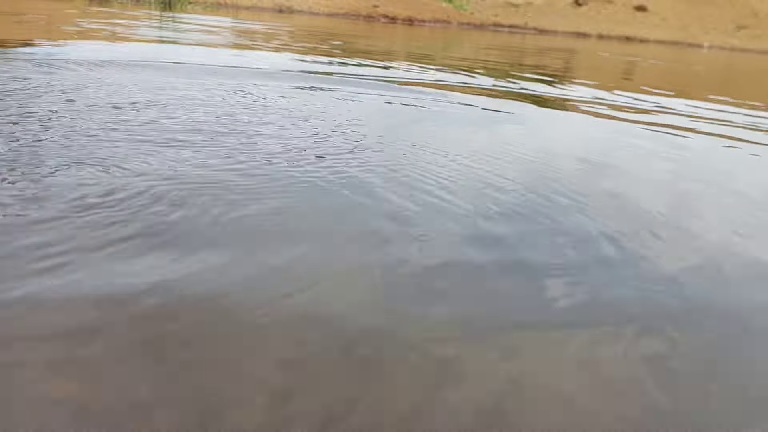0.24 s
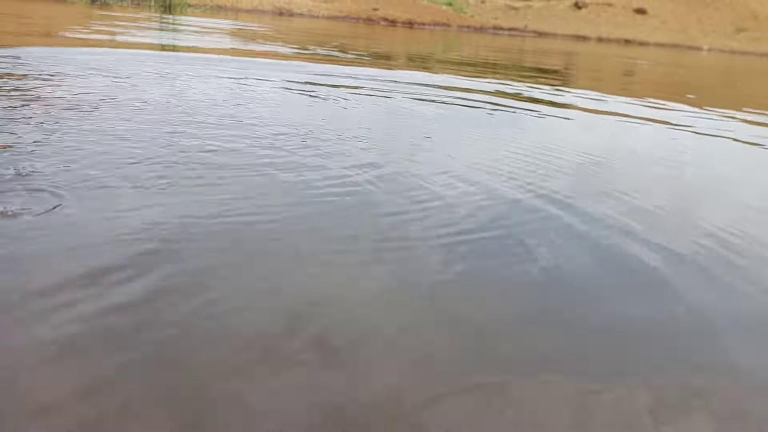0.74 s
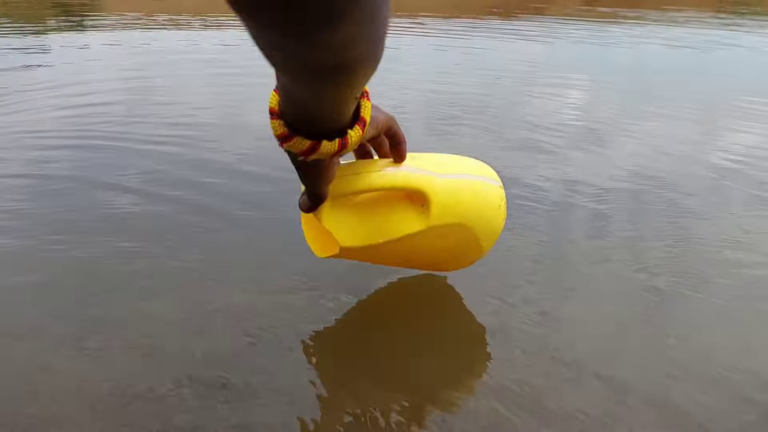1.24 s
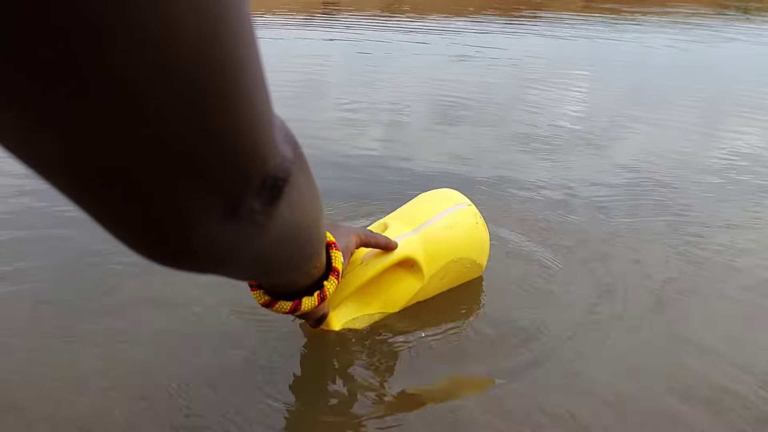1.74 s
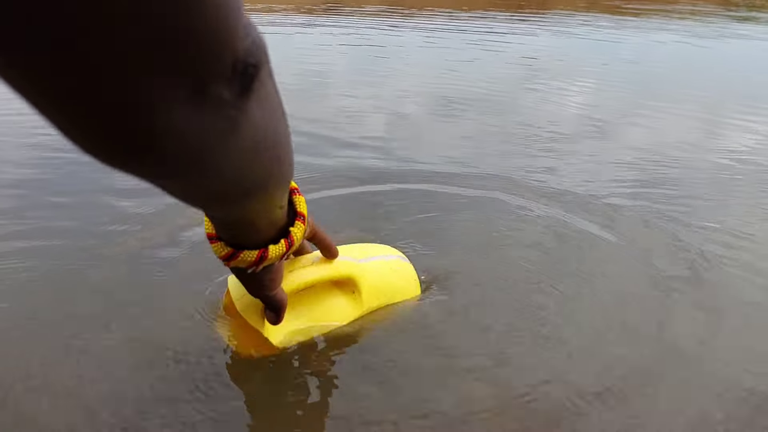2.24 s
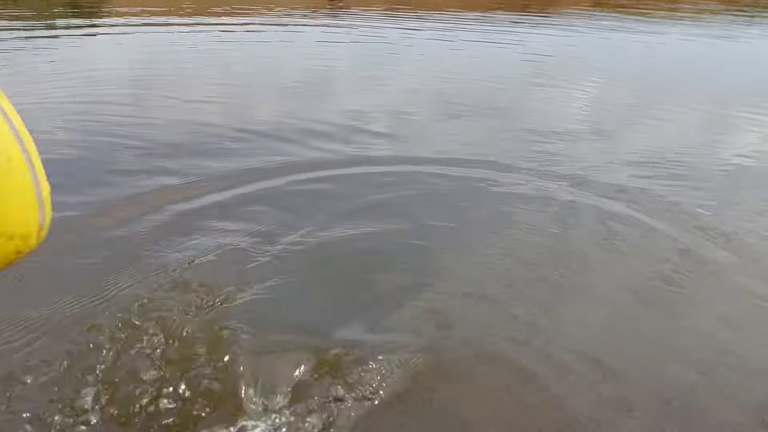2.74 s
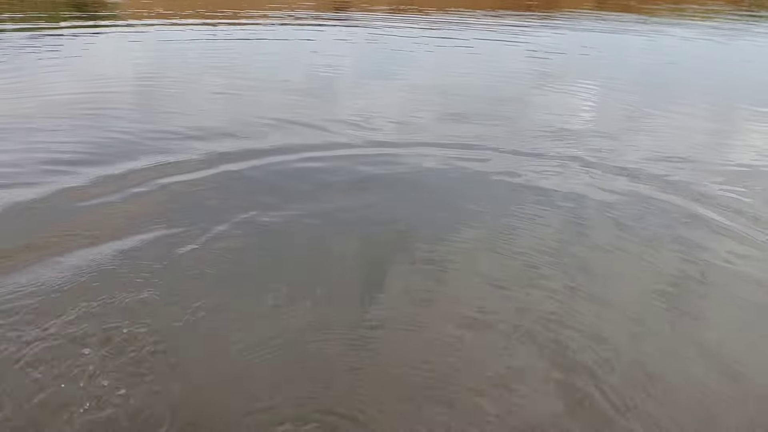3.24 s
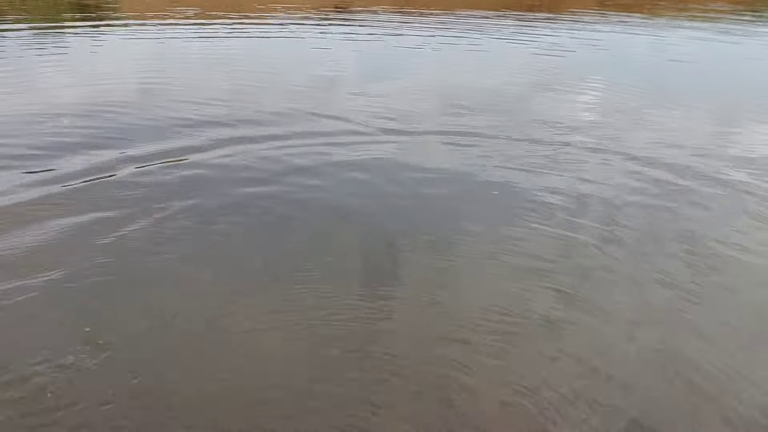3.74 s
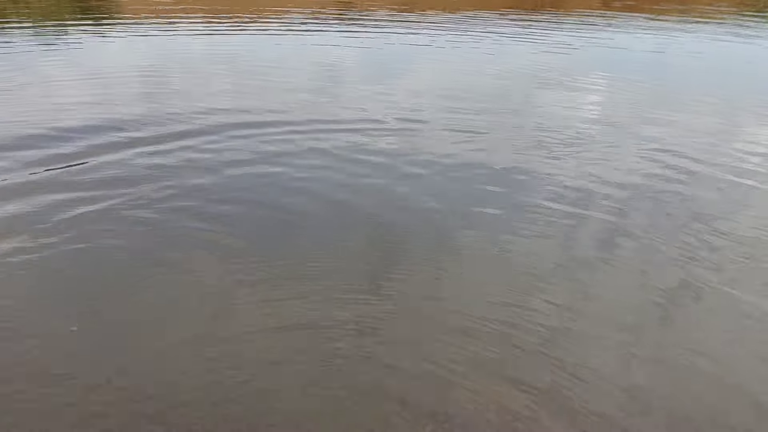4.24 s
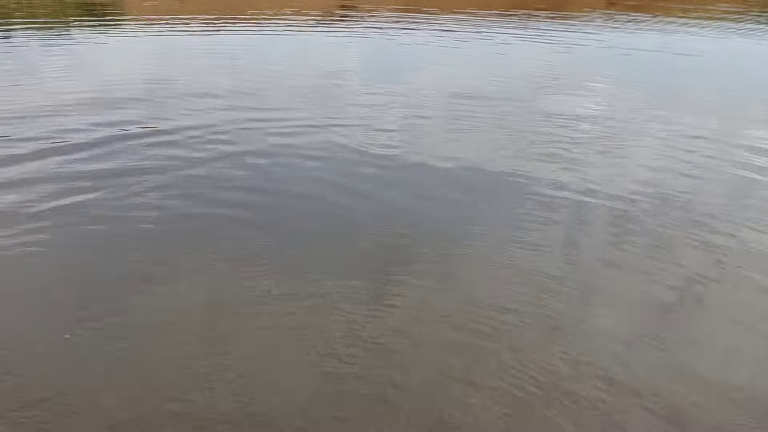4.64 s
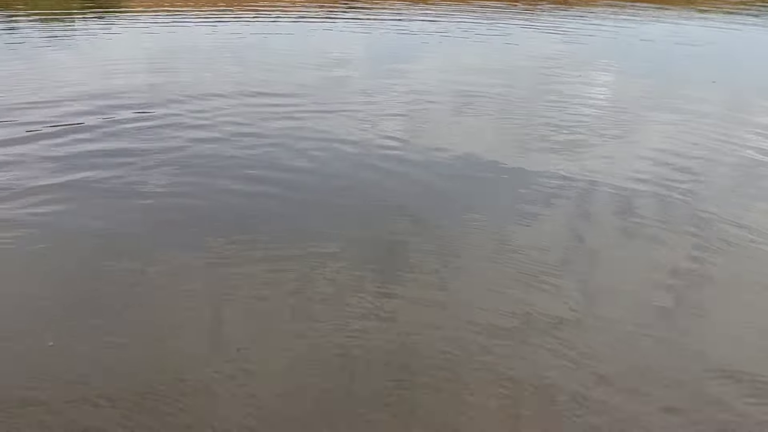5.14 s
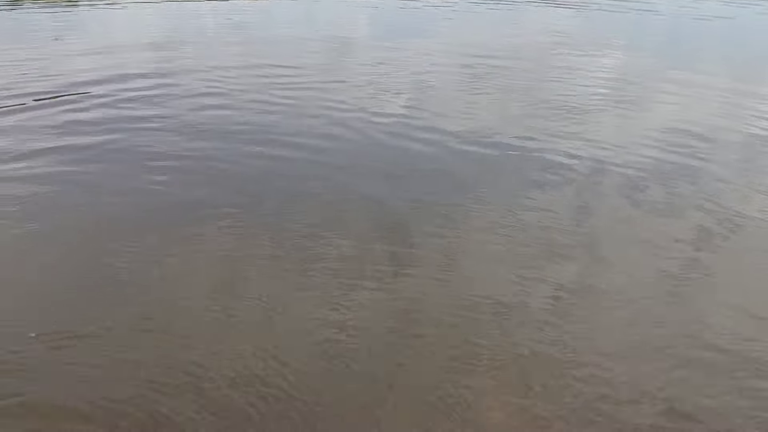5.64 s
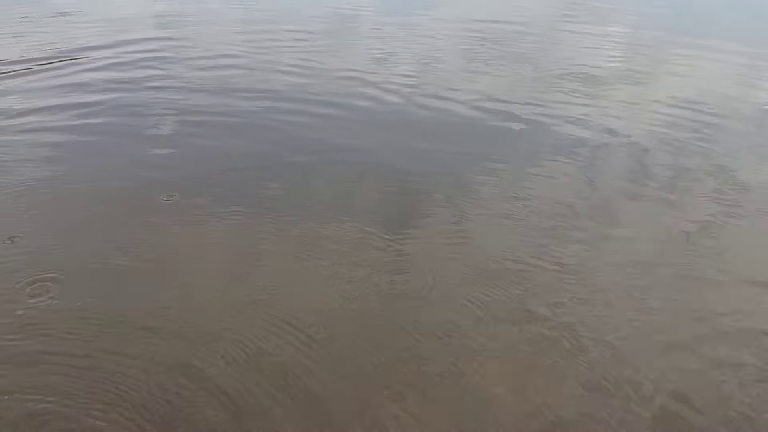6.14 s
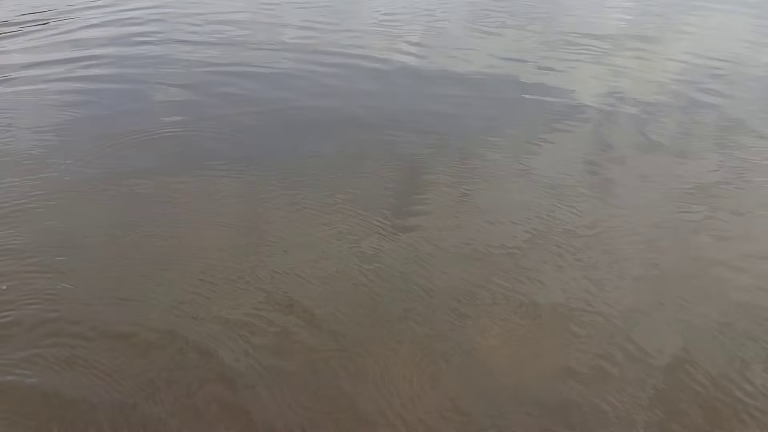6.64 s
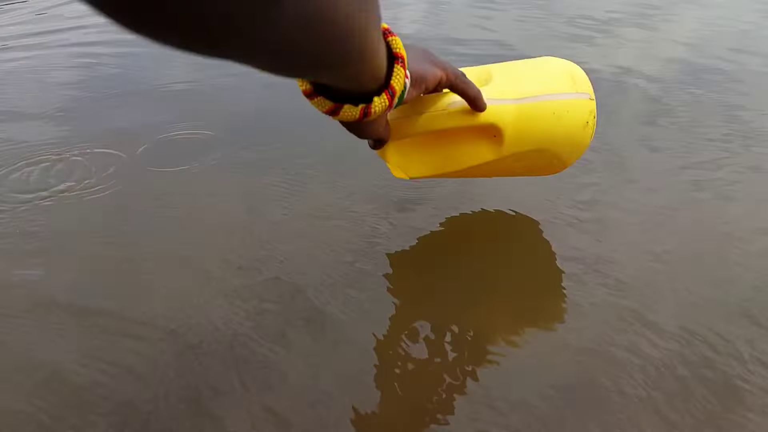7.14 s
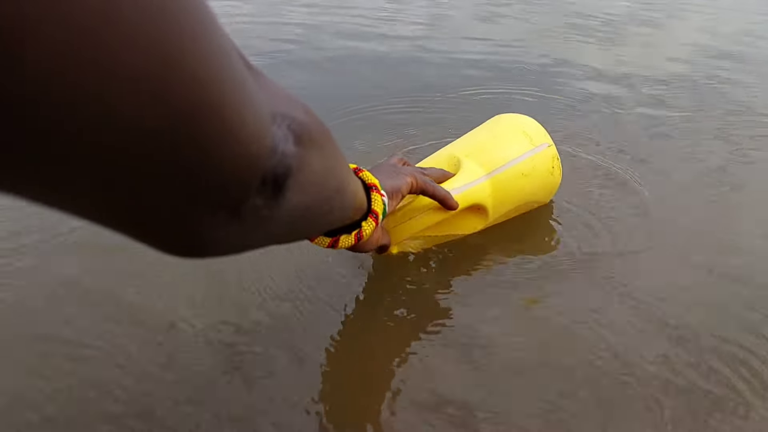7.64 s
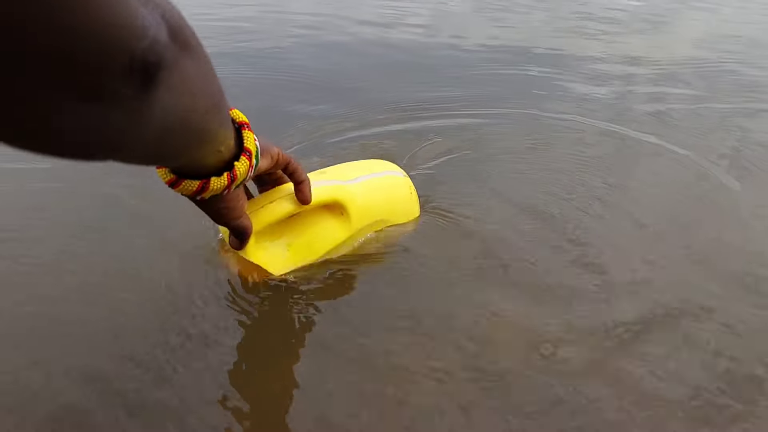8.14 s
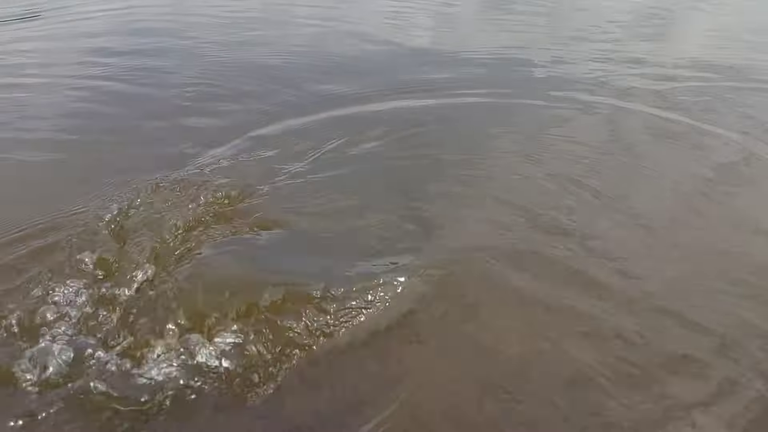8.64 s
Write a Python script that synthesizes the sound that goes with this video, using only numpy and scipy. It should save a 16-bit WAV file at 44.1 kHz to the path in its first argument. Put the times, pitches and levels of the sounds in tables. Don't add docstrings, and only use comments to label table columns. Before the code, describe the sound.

Close stereo microphone in the open: a rapid engine throb fills the first second, then drops far away. Jug water plips, gulps and splashes near centre; drops patter leftward; the stream drums and slaps inside a plastic can for over two seconds. After a hollow knock, violent low gusts overload the right channel, stop suddenly, and the jug bubbles and splashes again.

```python
import sys
import numpy as np
from scipy import signal
from scipy.fft import rfft, irfft, next_fast_len
from scipy.io import wavfile
from scipy.ndimage import uniform_filter1d, map_coordinates

SR = 44100
rng = np.random.default_rng(int(sys.argv[2]) if len(sys.argv) > 2 else 0)


def wrap_up_sound(samples):
    columns = np.atleast_2d(samples).T
    tamed = np.clip(columns, -1, 1)
    steps = np.round(tamed * 32767).astype(np.int16)
    wavfile.write(sys.argv[1], SR, steps)


def rack_gain(trim_db):
    fader = np.asarray(trim_db, float)
    return 10 ** (fader / 20)


N = 392038
T = np.arange(N) / SR
SCENE_CHANGE_S, GAIN_DROPS_S = 1.2495, 7.535

# time in seconds, level in dB.
POUR_FLOW = [(3.88, -73), (3.95, -50.5), (4.7, -52.5), (5.3, -47), (5.9, -53), (6.42, -51.5), (6.52, -87)]
# peak time in seconds, level in dB.
SURGES = [
    (3.96, -44),
    (4.34, -47.5),
    (4.57, -56),
    (4.8, -38.5),
    (4.95, -45),
    (5.16, -42),
    (5.43, -44.5),
    (6.04, -49),
    (6.24, -49.5),
    (6.39, -48),
]
# start in seconds, peak in dB.
RIM_SPLATS = [
    (3.932, -27),
    (3.951, -29),
    (4.136, -39),
    (4.709, -38),
    (4.822, -31),
    (4.9057, -26),
    (4.9577, -29),
    (5.26, -35),
    (5.5795, -35),
    (6.1264, -38),
]
# start in seconds, peak in dB.
WALL_SLAPS = [(3.9326, -37.5), (3.9523, -34.5), (4.335, -26), (4.5065, -45), (4.7106, -32), (4.755, -49),
              (4.7749, -49), (4.8188, -38), (4.861, -46), (4.908, -53), (4.9894, -49), (5.0956, -29),
              (5.135, -27), (5.2887, -31.5), (5.3276, -49), (5.389, -33), (5.4314, -29), (5.5232, -29),
              (5.58, -26), (5.633, -29), (5.694, -39), (5.746, -26.5), (5.8021, -47), (5.833, -31),
              (5.948, -37), (6.0076, -54), (6.0265, -29), (6.1284, -34), (6.2002, -29), (6.2403, -32),
              (6.3592, -42), (6.3753, -51)]
# centre in Hz, width in Hz, level in dB.
CAN_MODES = [(714, 133, -11.5), (1283, 34, -10), (1589, 42, -4.5), (2050, 36, -8), (2610, 240, -11.5),
             (3487, 230, -3), (5360, 150, -13.5), (5360, 360, -10.5), (6950, 170, -32)]
# time in seconds, share of pitch.
CAN_TUNING = [(3.9, 1.02), (5.0, 1.02), (5.6, .975), (5.95, .97), (6.45, 1.0)]
# time in seconds, level in dB.
CAN_RING = [(3.9, -2), (5.05, -1.5), (5.13, 0), (5.9, 0), (6.0, -3), (6.5, -4)]
# frequency in Hz, gain in dB.
STREAM_TONE = [(80, -22.5), (160, 4.5), (400, -7), (1000, -24), (2500, -11.5), (5000, -38), (9000, -67)]
# frequency in Hz, density in dB per Hz.
SPATTER_TONE = [(2060, -35), (3500, -21), (3950, -9.5), (6910, -10), (8530, -19), (12400, -13),
                (16000, -25)]

# start in seconds, peak in dB, pitch in Hz, pitch rise as a share,
# T60 in seconds.
GULPS = [(2.012, -43.5, 330, 1.5, 0.059), (2.048, -50.5, 776, 1, 0.068), (2.095, -53, 378, 2.5, 0.14),
         (2.268, -51.5, 2010, -0.5, 0.046), (2.318, -54, 630, .1, 0.053), (2.518, -44.5, 450, .2, 0.057),
         (2.784, -35, 800, 0, .05), (2.789, -30, 430, 0.3, 0.036), (2.863, -29.5, 554, 1.1, 0.042),
         (2.866, -33.5, 770, 2.5, 0.045), (2.62, -47, 623, 1, 0.082), (2.745, -48, 447, 2, 0.12),
         (2.39, -55, 786, 0, 0.047), (5.02, -41, 490, 3.5, 0.075), (6.843, -51, 570, 0, 0.037),
         (8.565, -50, 387, 0, 0.066), (3.951, -32.5, 166, 0, 0.16), (5.085, -42.5, 377, 1, 0.079),
         (7.005, -29.5, 380, 0, 0.088), (7.938, -50, 318, 0, 0.065), (8.044, -49.5, 336, -1, 0.088),
         (8.076, -41, 342, 0.4, 0.062), (8.104, -42.5, 421, 0, 0.091), (8.34, -54.5, 1040, 0, 0.066),
         (8.39, -47.5, 797, 5, 0.11), (8.447, -51, 935, 0, 0.069), (8.472, -42, 853, 3, 0.069),
         (8.545, -41, 640, 0.9, 0.057), (8.578, -49, 550, 2.5, 0.086), (8.606, -53, 500, 2, 0.18),
         (8.662, -52, 413, 5, 0.13), (8.677, -38.5, 713, 1.1, 0.064), (8.685, -44, 397, -0.5, 0.052),
         (8.692, -46.5, 626, .5, 0.093), (8.698, -48, 885, 8, 0.107), (8.785, -47, 715, 0, 0.08)]
# start in seconds, peak in dB, pitch in Hz, # pitch
# rise as a share, T60 in seconds.
MORE_GULPS = [
    (3.0285, -32, 620, -.15, .09),
    (3.04, -49, 560, .35, .2),
    (3.029, -37, 1000, .9, .036),
    (3.034, -45, 1330, .15, .04),
    (3.125, -36, 600, .15, .06),
    (3.14, -52, 650, .8, .13),
    (3.148, -57, 1050, 2.5, .07),
    (3.166, -54, 1000, 25, .5),
]
# start in seconds, peak in dB, pitch in Hz, pitch rise as a share.
SLOSHES = [
    (2.037, -46, 339.5, -0.9),
    (2.569, -38.5, 420, 2.5),
    (2.655, -52, 451, -1),
    (7.898, -61, 414, -0.9),
    (8.511, -53, 394, -0.5),
]
# start in seconds, peak in dB, pitch in Hz.
PLIPS = [(1.593, -45, 2670), (1.604, -46.5, 1140), (1.693, -52, 2380), (1.305, -50, 1390),
         (2.492, -37.5, 1410), (2.565, -31, 1090), (2.617, -40, 1060), (2.734, -26, 2230),
         (3.625, -54.5, 870), (4.3391, -36.5, 1640), (5.399, -38, 1850), (7.006, -41.5, 1360),
         (7.7388, -61, 1236), (8.321, -41, 1510), (8.363, -47, 1540), (8.419, -39, 1420),
         (8.4707, -42, 1240), (8.488, -37.5, 1000), (8.5834, -41.5, 1210), (8.653, -32, 2550),
         (8.664, -38, 2900), (8.566, -47, 2250), (8.687, -45, 1640), (8.74, -50, 1280), (6.634, -48, 1640),
         (6.634, -50.5, 2700), (8.3, -45, 2400), (7.007, -43.5, 2300)]
# start in seconds, peak in dB, pitch in Hz.
NECK_BLIPS = [(1.89, -57.5, 1310), (1.935, -52.5, 1240), (1.986, -57, 2150), (2.036, -46, 1217),
              (2.104, -55, 1170), (2.131, -52.5, 1230), (2.15, -64, 2200), (2.215, -62, 1300),
              (2.33, -58, 2150), (7.935, -57, 1240), (7.968, -56, 2290), (8.024, -50.5, 2260),
              (8.034, -50, 1190), (8.06, -50, 1255), (8.077, -44.5, 1360), (8.082, -45, 1800),
              (8.084, -43.5, 2140), (8.103, -61, 1320), (8.125, -57, 1330)]
# start in seconds, peak in dB, pitch in Hz.
DROPS = [(0.2905, -37, 2550), (0.6878, -32, 5000), (1.3055, -49, 2480), (1.486, -47.5, 4385),
         (2.2263, -50.5, 5000), (2.5354, -34.5, 6400), (2.628, -35, 3600), (2.668, -34, 3300),
         (2.6927, -33.5, 3200), (2.7916, -27, 2800), (2.835, -34, 5100), (2.8629, -25, 4440),
         (3.1053, -40, 6700), (2.8625, -29, 2870), (3.4317, -48, 2500), (3.4715, -49, 7900),
         (3.5262, -39.5, 4770), (3.5788, -49, 6000), (3.702, -68, 7800), (3.7179, -39.5, 5280),
         (3.767, -41.5, 5000), (3.8104, -37.5, 6400), (3.8545, -39, 4700), (6.6365, -36.5, 5030),
         (3.622, -53.5, 2470), (6.7785, -45, 3480), (6.822, -50, 5200), (7.005, -38, 3060),
         (8.0785, -42, 4350), (8.003, -46.5, 5600), (1.662, -47, 5900)]
# start in seconds, peak in dB, pitch in Hz.
SPECKS = [(2.4606, -45, 2520), (2.4776, -39, 5350), (2.5107, -41, 2520), (2.5484, -32.5, 3360),
          (2.598, -39, 3780), (2.618, -44, 3930), (2.6484, -30.5, 3550), (2.7158, -38, 2210),
          (2.776, -38, 2850), (2.9282, -38, 13800), (2.989, -43, 5630), (3.014, -45, 12700),
          (6.5407, -49, 3080), (6.8433, -43, 2160), (8.2247, -52, 5220), (8.297, -57, 2410),
          (8.3629, -55, 2240), (8.3908, -49, 2050), (8.4088, -55, 4190), (8.4193, -43, 6970),
          (8.4477, -54, 2080), (8.4791, -41, 2140), (8.4989, -39, 2220), (8.5649, -40, 2170),
          (8.6088, -52, 2090), (8.6243, -39, 2480), (8.672, -39, 9100), (8.68, -34, 2980),
          (8.768, -46, 6750), (8.7999, -41.5, 3900), (8.8273, -52, 2120)]
# start in seconds, peak in dB, pitch in Hz.
CRACK = (1.0456, -2.5, 2140)

# peak time in seconds, level in dB, seconds to build 20 dB,
# spray over gurgle in dB.
SPLASHES = [(1.3, -63, 0.32, -17), (1.612, -59.5, 0.06, -0.5), (2.049, -59.5, 0.09, -0.5),
            (2.25, -60, 0.37, -6.5), (2.533, -55, 0.12, -9.5), (2.631, -44, 0.15, -5.5),
            (2.72, -44.5, 0.1, -21), (2.792, -38, 0.1265, -4.5), (3.042, -61, -0.01, -24.5),
            (3.17, -60, 0, -22), (3.61, -78, 0.08, 19.5), (8.04, -65, 0.68, -3), (8.33, -70, 0.6, -4),
            (8.47, -55, 0.0649, -6), (8.53, -49.5, 0.14, -5), (8.585, -51, 0.14, -9.5),
            (8.65, -50.5, .12, -14), (8.68, -44, 0.047, -10.5), (8.74, -62, 0, -9), (8.84, -63.5, 0.5, -5)]
# time in seconds, level in dB.
TRICKLE = [(1.25, -78.5), (2.898, -66), (3.8, -66), (3.92, -48.5), (3.98, -66.5), (7.55, -73), (7.6, -93),
           (8.9, -92)]
# frequency in Hz, density in dB per Hz.
SPRAY_TONE = [(1200, -39), (2600, -15.5), (5350, -6), (8800, -9.5), (12500, -1.5), (15500, -9.5),
              (16200, -20)]
# peak time in seconds, level in dB.
NECK_AIR = [(1.99, -57), (2.05, -51), (2.11, -54), (2.16, -54), (2.21, -60), (2.26, -60), (7.94, -72),
            (8.0, -71), (8.04, -60), (8.08, -43.5), (8.13, -57)]
# centre in Hz, width in Hz, level in dB.
JUG_MODES = [(348, 180, -1.5), (1294, 110, -2.5), (2140, 170, -9.5), (3300, 280, -13.5)]
# peak time in seconds, level in dB.
RUSTLE = [
    (6.64, -61.5),
    (6.725, -58.5),
    (7.005, -59),
    (7.25, -53),
    (7.36, -52),
    (7.46, -57),
]
# time in seconds, left port's lead in samples.
WATER_LAG = [(0, -20), (1.25, -20), (1.3, 3), (2.6, 4), (2.7, 16), (3, 17), (3.02, 6), (3.08, 6),
             (3.11, 17), (3.8, 17), (3.92, 24), (6.5, 24), (6.63, 17), (7, 4), (7.9, 5), (8.3, 7)]

# time in seconds, firing rate in Hz, level in dB.
NEAR_ENGINE = [(0, 48.26, -33), (.5, 48.49, -30), (1.05, 48, -29.5), (1.15, 47.6, -30.5),
               (1.235, 47.9, -37), (1.25, 49.55, -68)]
FAR_ENGINE = [(1.24, 44.5, -91), (1.26, 42.97, -52), (3, 43.2, -51.5), (5, 43.45, -59),
              (7.52, 43.86, -53.5), (7.6, 44.35, -62.5), (8.89, 43.67, -66.5)]
# multiple of firing rate, level in dB.
NEAR_ORDERS = [(1, -7.5), (2, 1.5), (3, 0), (4, -16), (5, -4.5), (6, 2.5), (7, -1), (8, -23.5), (9, -8),
               (10, -3), (11, -8), (12, -7.5), (13, -53.5), (14, -24), (15, -6.5), (16, -7.5), (17, -13.5)]
FAR_ORDERS = [(1, -3), (2, -6), (3, 3.5), (4, 0), (5, 2), (6, 4), (7, 3.5), (8, -4), (9, -9), (10, -12.5),
              (11, -15.5), (12, -14), (14, -39)]
# frequency in Hz, density in dB per Hz.
CLATTER_TONE = [(60, -21), (120, -17.5), (300, -11.5), (500, -14.5), (903, -20.5), (3120, -26.5),
                (7000, -36), (9000, -45.5), (12100, -41), (16000, -54)]

# time in seconds, level in dB.
BREEZE = [(1.25, -67), (1.7, -55), (3.6, -61.5), (4.2, -54.5), (5.1, -51), (5.5, -55), (6.5, -58.5),
          (7.55, -46), (7.62, -65), (8.78, -66), (8.82, -40.5), (8.9, -65)]
# peak time in seconds, level in dB.
GUSTS = [(1.78, -48), (2.26, -49), (2.62, -37.5), (2.9, -40.5), (3.02, -43), (3.46, -42), (4.25, -34.5),
         (4.369, -27.5), (4.59, -36), (4.98, -43.5), (5.18, -35.5), (6.56, -33), (6.657, -20.5),
         (6.78, -27), (6.94, -27), (7.2, -17), (7.311, -21), (7.407, -13.5), (7.52, -17.5)]
# time in seconds, peak in dB.
BUFFETS = [(6.552, -33.5), (6.614, -30), (6.641, -40), (7.117, -25.5), (7.17, -17), (7.19, -16.5),
           (7.308, -22), (7.322, -14), (7.353, -14), (7.37, -22), (7.384, -10), (7.403, -5.5), (7.406, -3),
           (7.419, -12.5), (7.479, -15.5), (7.489, -17), (7.509, -19.5), (7.519, -20.5)]
# frequency in Hz, density in dB per Hz.
GUST_TONE = [(15, -38), (30, -8.5), (55, 2), (110, -7.5), (200, -20.5), (400, -60.5), (900, -92)]
GUST_EDGE_TONE = [(40, -35.5), (150, 3.5), (300, -15), (550, -30), (1200, -68.5), (2500, -100)]
# frequency in Hz, density in dB per Hz.
HISS_TONE = [(350, -18.5), (600, 0), (2200, -17), (4370, -11), (7080, -6.5), (8590, -22.5), (11600, -9.5),
             (16200, -14)]
# frequency in Hz, density in dB per Hz.
WASH_TONE = [(250, -15.5), (600, -4.5), (3300, -12.5), (6000, -20.5)]


def pour():
    flow_db, = curves(POUR_FLOW)
    stream_db = swells(SURGES, 0.081, 1.34, flow_db)
    stream_db = np.minimum(stream_db, flow_db + 7.0)
    spatter_db = -54.5 + 1.27 * (stream_db + 49.5)
    surge_db = wobble(30)

    churn = fizz(count=6000, hz=1800, spread=0.722, cycles=20.0, size_db=0.5, rise=0.068, longest_s=0.016)
    rush = 0.82 * rng.standard_normal((2, N))
    stream = patchy(can(churn + rush), depth_db=4.0, bins=4, frames=20)
    spatter = patchy(grit(count=7000, spectrum=SPATTER_TONE, smooth=1.2), depth_db=2.2, bins=18, frames=6)

    out = stereo(rack_gain(stream_db + surge_db) * stream, 0.25, 3.2, 24.4)
    return out + stereo(rack_gain(spatter_db + surge_db + wobble(90)) * spatter, 0.29, 8.9, 24.3)


def can(x):
    steps = np.array([.97, .995, 1.02])
    where = np.interp(np.interp(T, *np.transpose(CAN_TUNING)), steps, np.arange(3))
    where = np.clip(where + .35 * wobble(6), 0, 2)
    ringing = np.zeros((2, N))
    for k, step in enumerate(steps):
        share = np.sqrt(np.clip(1 - np.abs(where - k), 0, 1))
        ringing += share * filtered(np.roll(x, 999 * k, 1), lambda f: rings(CAN_MODES)(f / step))
    direct = filtered(x, lambda f: tone(STREAM_TONE)(f) * rack_gain(-2.0))
    return direct + rack_gain(np.interp(T, *np.transpose(CAN_RING))) * ringing


def slaps():
    s, db = np.transpose(WALL_SLAPS)[:, :, None]
    hz, width_hz, mode_db = np.transpose(CAN_MODES)
    scatter_db = 5 * rng.standard_normal((len(WALL_SLAPS), len(CAN_MODES)))
    gain = rack_gain(db + mode_db - 6 + scatter_db)
    tuned_hz = hz * np.interp(s, *np.transpose(CAN_TUNING))
    t60_s = np.log(1000) / np.pi / width_hz
    rows = np.broadcast_arrays(s, gain, tuned_hz, 0, t60_s)
    ring = grains(*(v.ravel() for v in rows), 4)
    return stereo([ring, ring], 1., 1.9, 27.0)


def plops():
    drops = list(DROPS)
    for (s, db), g in zip(RIM_SPLATS, rng.standard_normal(len(RIM_SPLATS))):
        drops.append((s, db, 3150 * np.exp(0.13 * g)))
    drops += [(s, db - 6, hz) for s, db, hz in SPECKS]

    slosh_t60_s = .3
    big = GULPS + MORE_GULPS + [row + (slosh_t60_s,) for row in SLOSHES]
    small = [(s, db, hz, .12, 32 / hz) for s, db, hz in PLIPS]
    small += [(s, db, hz, .03, 75 / hz) for s, db, hz in NECK_BLIPS]
    small += [(s, db, hz, .15, 30 / hz) for s, db, hz in drops]
    s, db, hz, rise, t60_s = np.transpose(big + small)
    lead_samples = np.interp(s, *np.transpose(WATER_LAG))
    lead_s = lead_samples / SR
    pan_db = np.interp(hz, [1000, 5000], [-2, 3]) + lead_samples / 2.8
    attack_cycles = np.where(np.arange(len(s)) < len(big), .35, 1.3)
    left = grains(s, rack_gain(db + 6.0 + 0.86 * pan_db / 2), hz, rise, t60_s, attack_cycles)
    right = grains(s + lead_s, rack_gain(db + 6.0 - 0.64 * pan_db / 2), hz, rise, t60_s, attack_cycles)
    return np.array([left, right]) + drop_spray(drops) + crack()


def drop_spray(drops):
    fine_hz, puff_t60_s = 4400, .014
    puffs = np.zeros((2, N))
    fade = rack_gain(-3 - 60 * T[:SR // 50] / puff_t60_s)
    for s, peak_db, hz in drops:
        puffs[int(hz > fine_hz), round(s * SR):][:len(fade)] += rack_gain(peak_db) * fade
    coarse = puffs[0] * noise(SPATTER_TONE)
    fine = filtered(puffs[1] * noise(SPATTER_TONE), lambda f: 1 / (1 + (fine_hz / (f + 1)) ** 8))
    return stereo(coarse + fine, 0.38, 7.4, 20)


def crack():
    s, peak_db, hz = CRACK
    tick = grains([s], [rack_gain(peak_db)], [hz], [.1], [.0021], 0.02)
    return -stereo([tick, tick], lead=-4)


def dipped_jug():
    lead = np.interp(T, *np.transpose(WATER_LAG))
    build_s = np.array(SPLASHES)[:, 2]
    mute_db = -99 * (T < SCENE_CHANGE_S)

    gurgle_db = swells(SPLASHES, build_s, 1) + mute_db
    gurgle = fizz(count=5000, hz=1800, spread=0.7, cycles=13, size_db=4, rise=0.3, longest_s=0.03)
    gurgle = patchy(gurgle + 0.61 * noise(WASH_TONE), depth_db=4.0, bins=4.3, frames=4.6)
    out = stereo(rack_gain(gurgle_db + 2.0) * gurgle, 0.18, 1.2, lead)

    spray_peaks = [(s, db + over_db) for s, db, _, over_db in SPLASHES]
    spray_db = swells(spray_peaks, build_s, 1, curves(TRICKLE)[0]) + mute_db
    spray = patchy(grit(count=5000, spectrum=SPRAY_TONE, smooth=.5), depth_db=3, bins=25, frames=3)
    out += stereo(rack_gain(spray_db - 1.0 + 3.6 * wobble(30)) * spray, 0.15, 8, lead)

    taps = (rng.random(N) < 70 / SR) * 5 + .5
    burble = taps * rng.standard_normal((2, N))
    cavity = unit(filtered(burble, lambda f: rings(JUG_MODES)(f) ** 2))
    out += stereo(rack_gain(swells(NECK_AIR, .02, 1.6) + 3.0) * cavity, 0.96, -1.3, lead)

    scrape_db = swells(RUSTLE, 0.019, 9.2)
    out += stereo(rack_gain(scrape_db + 0.5) * patchy(noise(WASH_TONE), depth_db=6.0), 0.17, 4.9, lead)
    return out + stereo(rack_gain(scrape_db - 8.0) * patchy(noise(SPATTER_TONE), depth_db=3.5), .5, 9.2, lead)


def pump():
    near, phase = engine(NEAR_ENGINE, NEAR_ORDERS, 0.66, scatter_db=-1.4, rough=.004)
    far, _ = engine(FAR_ENGINE, FAR_ORDERS, 3.2017, scatter_db=1.4, rough=.005)
    right_duck_db = 14 * np.clip(1 - (T - 7.54) / 1.2, 0, 1) * (T > 7.54)
    duck_db = np.array([0 * T, right_duck_db])

    cans = unit(filtered(rng.standard_normal((2, N)), rings(CAN_MODES)))
    tin = patchy(noise(CLATTER_TONE) + rack_gain(-19) * cans, depth_db=1.2, bins=3, frames=20)
    clatter_db = -43 - 10 * np.clip(1 - T / 0.53, 0, 1)
    clatter_db -= 7 * np.clip(1 + (T - SCENE_CHANGE_S) / 0.059, 0, 1)
    clatter_db -= 99 * (T > SCENE_CHANGE_S)
    clatter = tin * rack_gain(clatter_db - 4.8 * ((phase - .2) % 1) + wobble(22) + 7.0)

    out = stereo([near, near], lead=-21.0)
    out += stereo([far, far], lead=-25.5) * rack_gain(2.0 * wobble(6.5) - duck_db)
    return out + stereo(clatter, 0.29, 1.5, -24.0)


def engine(rows, orders, beat_s, scatter_db, rough):
    s, hz, db = np.transpose(rows)
    turns = np.cumsum(np.interp(T, s, hz)) / SR
    turns -= turns[round(beat_s * SR)]
    at = np.flatnonzero(np.diff(np.floor(turns)))
    puffs = np.zeros(N)
    puffs[at] = rack_gain(scatter_db * rng.standard_normal(len(at)))
    puffs[0] = 1
    puffs += rough * rng.standard_normal(N)

    pipe = [(0.87, -43)] + [(k * np.mean(hz), v) for k, v in orders] + [(2500, -87.5)]
    cepstrum = irfft(np.log(tone(pipe)(np.fft.rfftfreq(8192, 1 / SR)) + 1e-4))
    cepstrum[1:4096] *= 2
    cepstrum[4097:] = 0
    puff = np.roll(irfft(np.exp(rfft(cepstrum) + 1.1j)), 200)[:4096]
    thuds = unit(signal.fftconvolve(puffs, puff)[:N])
    return rack_gain(np.interp(T, s, db)) * thuds, turns % 1


def wind():
    breeze_db, = curves(BREEZE)
    gusts = np.array(GUSTS)
    build_s, dies, lee_db = 0.13, 0.91, -17.5
    left_db = swells(gusts + [0, lee_db], build_s, dies, breeze_db + 3 * wobble(23))
    right_db = swells(gusts, build_s, dies, breeze_db - 2 + 3 * wobble(7.9))
    db = np.array([left_db, right_db])
    dropped = np.clip((T - GAIN_DROPS_S) / 0.018, 0, 1)
    db = (1 - dropped) * db + dropped * np.minimum(db, [breeze_db, -72 + 20 * (T - 7.6)])

    lumps = rack_gain(3 * np.array([wobble(26), wobble(26)]))
    out = rack_gain(db + 2.0) * unit(lumps * noise(GUST_TONE))
    edge_db = db - 8.0 + 1.07 * (db + 24.0)
    out += rack_gain(edge_db) * unit(lumps * noise(GUST_EDGE_TONE))
    for s, peak_db in BUFFETS:
        u = (T - s - .004) / 0.0018
        out[1] += rack_gain(peak_db + 4.0) * (1 - 2 * u * u) * np.exp(-np.minimum(u * u, 50))
    return out


def background_hiss():
    hiss = patchy(noise(HISS_TONE), depth_db=-2.0, bins=41, frames=9.2)
    hiss = rack_gain(-73.5) * hiss * rack_gain([[2], [-2]])
    return hiss * rack_gain(-13 * np.clip(1 - (T - 7.6) / 1.3, 0, 1) * (T > 7.6))


def grains(s, gain, hz, rise, t60_s, attack_cycles):
    t = np.arange(int(np.max(t60_s) * SR))[None] / SR
    columns = np.broadcast_arrays(s, gain, hz, rise, t60_s, attack_cycles)
    s, gain, hz, rise, t60_s, attack_cycles = (np.asarray(v, float)[:, None] for v in columns)
    climb = rise * t / t60_s
    burst_db = 250 * np.maximum(climb - 1, 0)
    wave = np.sin(2 * np.pi * hz * t * (1 + climb / 2))
    wave = wave * rack_gain(-60 * t / t60_s - burst_db) * (1 - np.exp(-t * hz / attack_cycles)) ** 2
    at = (s * SR).astype(int) + np.arange(t.size)
    return np.bincount(at.ravel(), (gain * wave).ravel(), N + SR)[:N]


def fizz(count, hz, spread, cycles, size_db, rise, longest_s):
    def swarm():
        u, g = rng.random((count, 2)), rng.standard_normal((count, 2))
        pitch_hz = np.clip(hz * np.exp(spread * g[:, 0]), 200, 15000)
        life_s = np.minimum(cycles / pitch_hz * np.exp(0.61 * g[:, 1]), longest_s)
        gain = rack_gain(-size_db * np.log(u[:, 1] + 0.038))
        return grains(u[:, 0] * N / SR, gain, pitch_hz, rise, life_s, 0.27)
    return unit(np.array([swarm(), swarm()]))


def grit(count, spectrum, smooth):
    specks = fizz(count=count, hz=6760, spread=0.67, cycles=4.9, size_db=2.5, rise=0.089, longest_s=0.0033)
    ticks = unit((rng.random(N) < 90 / SR) * rng.standard_normal((2, N)))
    mix = specks + 0.75 * ticks + smooth * rng.standard_normal((2, N))
    return unit(filtered(mix, tone(spectrum)))


def noise(spectrum):
    return unit(filtered(rng.standard_normal((2, N)), tone(spectrum)))


def patchy(x, depth_db, bins=5, frames=10):
    z = signal.stft(x, nperseg=512)[2]
    field = uniform_filter1d(rng.standard_normal(z.shape[1:]), int(bins), 0)
    field = uniform_filter1d(field, int(frames), 1)
    return unit(signal.istft(z * rack_gain(depth_db * unit(field)), nperseg=512)[1][:, :N])


def rings(modes):
    def response(f):
        total = 0
        for k, (hz, width_hz, db) in enumerate(modes):
            damping = 1j * f * width_hz
            total = total + (-1) ** k * rack_gain(db) * damping / (hz * hz - f * f + damping)
        return total
    return response


def tone(points):
    f, db = np.transpose(points)
    return lambda hz: rack_gain(np.interp(np.log(hz + 1), np.log(f + 1), db, right=-120))


def filtered(x, response):
    m = next_fast_len(N + SR // 2)
    return irfft(rfft(x, m) * response(np.fft.rfftfreq(m, 1 / SR)), m)[..., :N]


def swells(rows, build_s, dies, *beds_db):
    s, db = np.transpose(rows)[:2, :, None]
    t, build_s = T[::64], np.reshape(build_s, (-1, 1))
    fall = np.maximum((s - t) / build_s, (t - s) / build_s / dies)
    power = np.sum(rack_gain(2 * (db - 20 * fall)), axis=0)
    return 10 * np.log10(np.interp(T, t, power) + sum(rack_gain(2 * b) for b in beds_db) + 1e-12)


def curves(rows):
    s, *cols = np.transpose(rows)
    return [np.interp(T, s, c, left=-120, right=-120) for c in cols]


def wobble(rate_hz):
    return map_coordinates(rng.standard_normal(int(N * rate_hz / SR) + 4), [T * rate_hz])


def unit(x):
    return x / np.sqrt(np.mean(x ** 2) + 1e-20)


def stereo(x, alike=1., pan_db=0, lead=0):
    angle = np.arccos(np.clip(alike, 0, 1)) / 2
    shared, apart = np.cos(angle) * x[0], np.sin(angle) * x[1]
    late = map_coordinates(shared - apart, [np.arange(N) - lead], order=3)
    return np.array([(shared + apart) * rack_gain(pan_db / 2), late * rack_gain(-pan_db / 2)])


def scene():
    return pour() + slaps() + plops() + dipped_jug() + pump() + wind() + background_hiss()


def low_pass(x):
    return signal.sosfilt(signal.butter(12, 16840, fs=SR, output="sos"), x)


def record(dry):
    soft = dry / (1 + np.abs(dry / .98) ** 4) ** (1 / 4)
    mix = filtered(soft, lambda hz: 1 / (1 + (hz / 16100) ** 40))
    return low_pass(mix)


dry = scene()
out = record(dry)
wrap_up_sound(out)
```